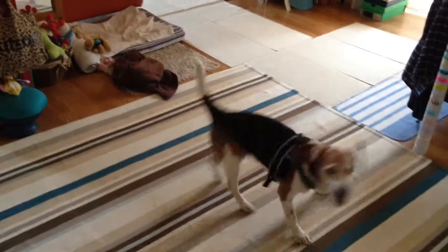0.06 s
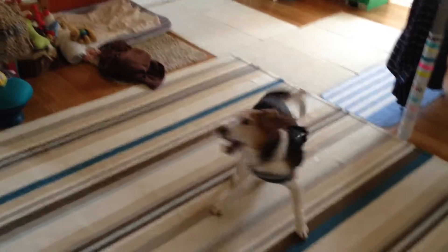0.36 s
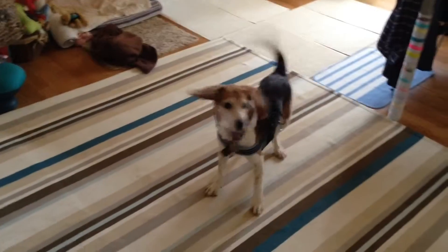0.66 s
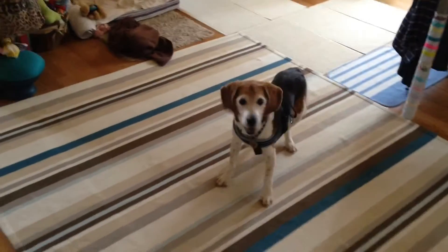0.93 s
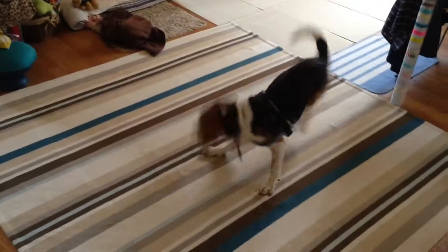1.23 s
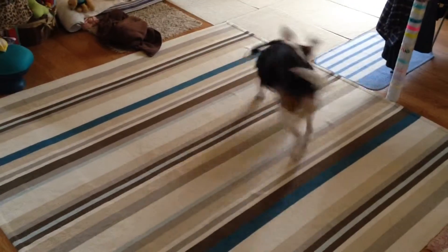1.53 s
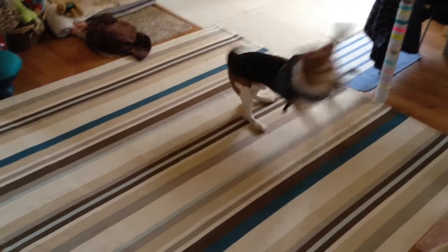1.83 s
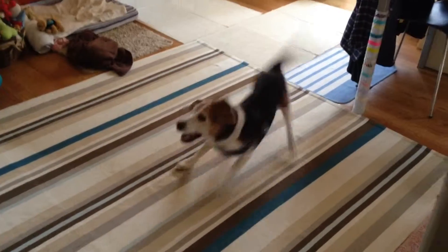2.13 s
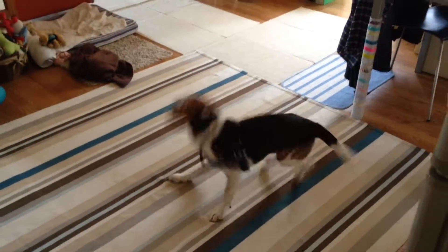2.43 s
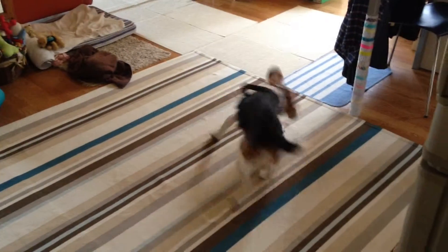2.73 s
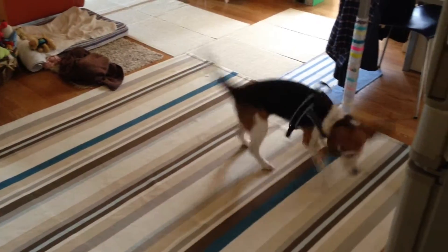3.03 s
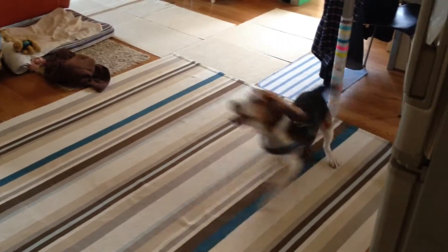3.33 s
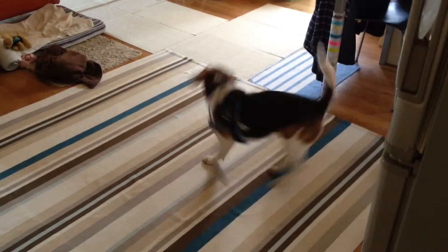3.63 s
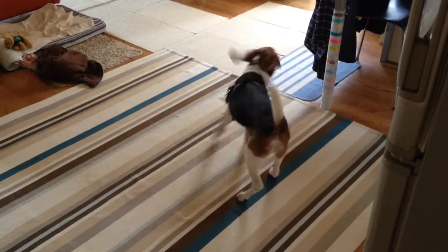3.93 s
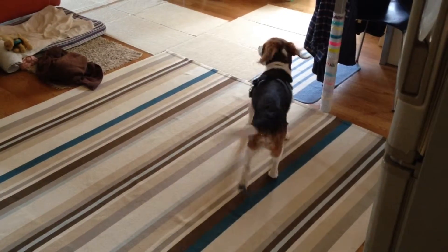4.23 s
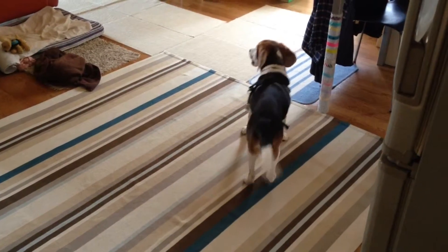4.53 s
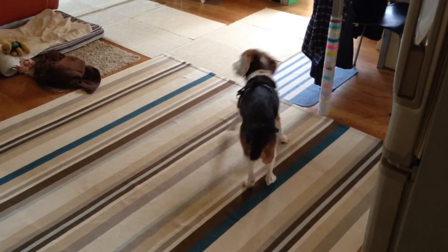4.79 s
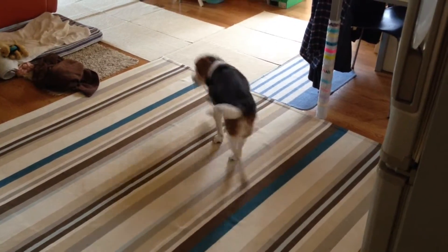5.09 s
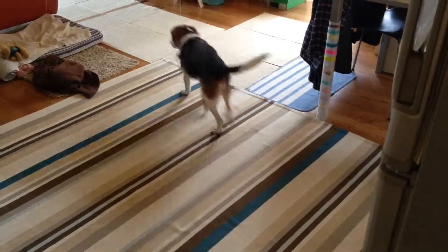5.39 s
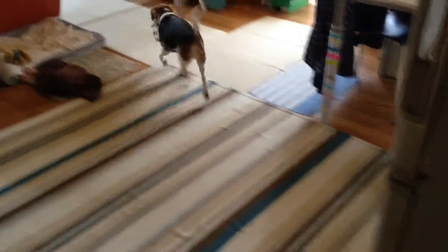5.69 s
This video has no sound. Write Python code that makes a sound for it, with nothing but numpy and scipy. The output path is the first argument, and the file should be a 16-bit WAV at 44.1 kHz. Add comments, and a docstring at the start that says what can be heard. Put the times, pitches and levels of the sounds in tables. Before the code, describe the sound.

A dog plays on a rug over wooden boards, heard from nearby in a quiet living room with a faint hush and a short echo. From the start its paws land in quick, irregular pats with tiny claw ticks, each followed by a low thud from the boards. The steps ease off just before 1 second, then return louder at about 1.2 seconds. Until nearly 4 seconds the paws thump and scrabble, scuffing the weave at around 1.5, 2.2 and 2.8 seconds, while fur and straps rustle softly. Metal harness fittings give small, bright clinks, loudest near 2.1 and 3.6 seconds. The steps fade and pause at about 4.2 seconds, with one faint clink just after. Near 5 seconds the dog trots off on softer steps, with light scuffs and a last small clink close to 6 seconds.

```python
"""A dog romps on a rug over wooden boards in a quiet living room. From the first step, each paw slaps
the rug and its weight makes the boards thud a moment later. After about a second the play gets louder:
turning paws scuff the weave, fur rustles, and metal harness fittings clink, loudest near 2.1 and 3.6 s.
The steps fade and pause at about 4.2 s. Near 5 s the dog trots off on softer steps."""
import sys
import numpy as np
from scipy import signal
from scipy.fft import rfft, irfft, next_fast_len
from scipy.io import wavfile

SR = 44100
rng = np.random.default_rng(int(sys.argv[2]) if len(sys.argv) > 2 else 0)


def output_pcm(signal):
    """Save a mono or channel-first signal as 16-bit PCM at the path in sys.argv[1].

    Samples are clipped to [-1, 1] before scaling.
    """
    pcm = np.clip(np.atleast_2d(signal).T, -1, 1) * 32767
    wavfile.write(sys.argv[1], SR, np.round(pcm).astype(np.int16))


N = 262395
T = np.arange(N) / SR


def from_db(db):
    """Turn decibels (dB) into a number to multiply by."""
    return 10 ** (np.asarray(db) / 20)


def at_hz(points, hz):
    """Read between the rows of a table, giving every octave equal room."""
    freqs, values = np.transpose(points)
    return np.interp(np.log(np.maximum(hz, 1)), np.log(freqs), values)


def coloured(noise, colour):
    """Shape a noise with rows of (Hz, dB), then set its average power to 1."""
    gains = from_db(at_hz(colour, np.fft.rfftfreq(len(noise), 1 / SR)))
    shaped = irfft(rfft(noise) * gains, len(noise))
    return shaped / np.sqrt(np.mean(shaped ** 2) + 1e-20)


def grains(per_s, spread_db, size=N):
    """Fibres catch and let go, making random clicks of uneven size."""
    sizes = from_db(spread_db * np.minimum(rng.exponential(1, size), 4)) * rng.choice([-1, 1], size)
    return sizes * (rng.random(size) < per_s / SR)


def stroke(s, rise, fade):
    """A loudness curve that peaks at time s. A fade time is how long a sound takes to drop 60 dB."""
    out = np.zeros(N)
    near = (T > s - 10 * rise) & (T < s + 2 * fade)
    t = T[near] - s
    out[near] = np.exp(np.where(t < 0, t / rise, -np.log(1000) * t / fade))
    return out


def ring(blows, hz, fade):
    """Each blow starts one pure tone that dies away."""
    r, w = np.exp(-np.log(1000) / (fade * SR)), 2 * np.pi * hz / SR
    return signal.lfilter([0, np.sin(w)], [1, -2 * r * np.cos(w), r * r], blows + 1e-18)


def resonance(x, hz, width_hz):
    """Keep the part of a sound that lies near one pitch."""
    r, w = np.exp(-np.pi * width_hz / SR), 2 * np.pi * hz / SR
    return signal.lfilter(np.array([1, 0, -1]) * (1 - r * r) / 2, [1, -2 * r * np.cos(w), r * r], x)


# The colour of the quiet room. Each row: frequency in Hz, level in dB.
HUSH_COLOUR = [(18, -74), (30, -26), (349, -7.5), (388, -7), (478, -7), (544, -2), (707, -6), (827, -11),
               (942, -12.5), (1320, -15.5), (1910, -17), (2410, -15.5), (2680, -15), (13200, -19),
               (15400, -20)]

def hush(level_db=-63):
    """A faint, steady noise fills the room."""
    return from_db(level_db) * coloured(rng.standard_normal(N), HUSH_COLOUR)


# How long the room echoes. Each row: frequency in Hz, fade time in seconds.
ECHO_FADES = [(100, 0.58), (300, 0.34), (800, 0.24), (2000, 0.18), (5000, 0.21), (14000, 0.22)]

def room_echoes(sound, first_echo_s=0.0024):
    """Sound bounces around a furnished room in a blur of echoes; the low ones last longest."""
    t = T[:SR // 2]
    edges = np.geomspace(60, 16000, 9)
    echo = np.zeros(len(t))
    for low, high in zip(edges, edges[1:]):
        band_filter = signal.butter(2, [low, high], "band", fs=SR, output="sos")
        band = signal.sosfilt(band_filter, rng.standard_normal(len(t)))
        echo += band * np.exp(-np.log(1000) * t / at_hz(ECHO_FADES, np.sqrt(low * high)))
    echo *= np.clip(t / first_echo_s - 1, 0, 1)
    return signal.fftconvolve(sound, echo / np.sqrt(np.sum(echo ** 2)))[:N]


# The notes of the furniture. Each row: pitch in Hz, width in Hz, level in dB.
FURNITURE_NOTES = [(900, 14, -1), (1450, 46, -28), (1760, 61, -3), (2000, 51, 13.5), (3420, 24, -27)]

def furniture(steps):
    """The furniture rings along with the steps."""
    return sum(from_db(db) * resonance(steps, hz, width_hz) for hz, width_hz, db in FURNITURE_NOTES)


# How much the coat and straps move. Each row: time in seconds, level in dB.
COAT_MOTION = [(0.0, -59.5), (0.13, -49), (0.38, -60.5), (0.63, -65), (1.08, -65.5), (1.23, -55),
               (1.37, -55.5), (1.47, -51.5), (1.94, -58.5), (2.14, -41.5), (2.5, -57), (3.53, -55),
               (4.36, -66), (4.71, -65.5), (5.78, -66.5), (5.95, -60)]
# The colour of their rustle. Each row: frequency in Hz, level in dB.
COAT_COLOUR = [(30, -23), (150, 12), (300, -0.5), (700, 7), (1500, 6.5), (2600, 1.5), (4000, -3.5),
               (7000, -15), (15000, -20)]

def coat(level_db=-3.5):
    """Fur and straps rub softly while the dog moves, and fall silent when it is stillest."""
    times, db = np.transpose(COAT_MOTION)
    power = from_db(2 * np.interp(T, times, db))
    still_power = from_db(2 * np.percentile(db, 10))
    moving = np.sqrt(np.maximum(power - still_power, 0))
    return from_db(level_db) * moving * coloured(grains(per_s=3000, spread_db=2.5), COAT_COLOUR)


# Swishes as the dog turns. Each row: time of the peak in seconds, level in dB.
TURNS = [(.17, -59), (.53, -60.5), (1.215, -59.5), (1.262, -55), (2.385, -63), (2.52, -60.5),
         (2.835, -55.5), (3.585, -63), (5.58, -61)]
# The colour of a swish. Each row: frequency in Hz, level in dB.
SWISH_COLOUR = [(800, -2.5), (2000, 7), (4000, 10.5), (7000, 6), (10000, 4), (15500, -10)]

def swishes():
    """Straps brush over fur with a smooth, airy sound."""
    sweep = sum(from_db(db) * stroke(s, rise=0.046, fade=0.29) for s, db in TURNS)
    return sweep * coloured(rng.standard_normal(N), SWISH_COLOUR)


# Metal fittings knocking. Each row: start in seconds, level in dB, pitch in Hz, fade time in seconds.
KNOCKS = [(0.113, -46, 5400, 0.15), (0.161, -52, 4700, 0.17), (0.5497, -43, 12100, 0.02),
          (1.09, -57.5, 6860, 0.031), (2.052, -49, 8300, 0.03), (2.065, -47, 5730, .049),
          (2.114, -33.5, 4800, 0.051), (2.221, -41.5, 4540, 0.068), (2.2957, -39.5, 5650, 0.052),
          (2.35, -46, 5240, .04), (2.87, -56, 5940, 0.2), (3.207, -52.5, 5400, 0.27),
          (3.595, -44.5, 4760, 0.05), (3.6274, -31.5, 4340, 0.032), (4.357, -49.5, 5340, 0.048),
          (5.808, -52, 5340, 0.11)]
# The notes of the harness ring. Each row: pitch in Hz, level in dB, fade time in seconds.
RING_NOTES = [(4022, -19, .12), (4755, -17, .1), (6253, -11, .12), (7077, -14, .36), (7376, -12, .48),
              (7400, -17, .45)]

def harness(ring_db=-7.5, hard_knock_db=-28.5, best_hz=4870, loss_db_per_octave=25):
    """Each fitting knocks with a short crack, and a loose metal ring sings on."""
    # The colour of a crack. Each row: multiple of its pitch, level in dB.
    shape = [(.1, -50), (.25, -32), (.5, -10), (.88, -5), (1, 0),
             (1.12, -3), (1.4, -7), (1.8, -19), (4, -31)]
    cracks, blows = np.zeros(N), np.zeros(N)
    for s, db, hz, fade in KNOCKS:
        colour = [(hz * multiple, level_db) for multiple, level_db in shape]
        crack = coloured(rng.standard_normal(next_fast_len(N)), colour)[:N]
        cracks += from_db(db) * stroke(s, .0001, fade) * crack
        shake_db = 0.45 * (db - hard_knock_db)   # harder knocks shake the ring looser
        loss_db = loss_db_per_octave * abs(np.log2(hz / best_hz))   # small, high fittings pass on less
        blows[int(s * SR)] = from_db(db + shake_db - loss_db + ring_db)
    return cracks + sum(from_db(db) * ring(blows, hz, fade) for hz, db, fade in RING_NOTES)


# The colours of paw pad, rug weave and claw. Each row: frequency in Hz, level in dB.
PAD_COLOUR = [(30, -53), (120, -4), (300, 5), (500, -0.5), (900, 0), (1300, -4.5), (1800, -46), (4000, -44)]
WEAVE_COLOUR = [(300, -46), (700, -44), (1200, -1.5), (1520, 2), (1850, -2), (2300, 1.5), (3000, -2),
                (3800, -16), (5000, -22.5), (9000, -52)]
CLAW_COLOUR = [(2000, -38), (3400, 11.5), (4300, 9.5), (5400, 2.5), (6500, -0.5), (8000, -8), (11000, -19),
               (15500, -34)]

def paw_on_rug(s, pressure, db, hardness_db, spot_hz, boost_db, per_s, spread_db, size=16384):
    """A paw crushes fibres, and that spot of floor boosts one pitch. Harder means more claw, less pad."""
    start = max(int(s * SR) - size // 4, 0)
    parts = [(db - 1.5 - hardness_db, PAD_COLOUR), (db, WEAVE_COLOUR),
             (db - 6.5 + hardness_db, CLAW_COLOUR)]
    crush = sum(from_db(part_db) * coloured(grains(per_s, spread_db, size), colour)
                for part_db, colour in parts)
    pressed = crush[:N - start] * pressure[start:start + size]
    woody = pressed + (from_db(boost_db) - 1) * resonance(pressed, spot_hz, width_hz=80 + spot_hz / 10)
    out = np.zeros(N)
    out[start:start + size] = woody * np.std(pressed) / np.std(woody)
    return out


# Paws sliding. Each row: time of the peak in seconds, level in dB, hardness in dB,
# rise and fade times in seconds, pitch of the floor spot in Hz, its boost in dB.
SLIDES = [(0.192, -54, 3.5, 0.013, 0.04, 4540, 5), (0.494, -57.5, 3.5, 0.01, 0.28, 2210, 4.5),
          (1.489, -56, -1, .03, 0.061, 1520, 18), (1.518, -41, 8.5, 0.0064, 0.031, 2280, 22),
          (1.689, -58.5, -1.5, 0.013, 0.25, 1230, 4), (2.095, -50.5, -3, 0.043, 0.52, 2170, 20),
          (2.212, -42.5, -3, 0.012, 0.088, 1050, 17), (2.231, -39, -2, .016, 0.11, 1570, 8.5),
          (2.549, -45.5, 1.5, 0.027, 0.12, 2360, 4.5), (2.826, -41, -0.5, 0.017, 0.097, 1900, 0),
          (4.154, -62, -5, 0.0093, 0.039, 1600, 11), (5.01, -61.5, 0, 0.0069, 0.16, 670, 15),
          (5.243, -60.5, -1, 0.005, .09, 587, 5), (5.573, -56.5, 2, 0.018, 0.18, 1610, 5),
          (5.665, -52, 4, 0.0034, 0.08, 2360, 15), (5.782, -54.5, 4, .0063, 0.22, 3170, -5)]

def scuffs(judder_db=1.5):
    """A sliding paw swells up and judders as it catches on the weave."""
    slides = np.zeros(N)
    for s, db, hardness_db, rise, fade, spot_hz, boost_db in SLIDES:
        pressure = stroke(s, rise, fade)
        slides += paw_on_rug(s, pressure, db, hardness_db, spot_hz, boost_db, per_s=2200, spread_db=3)
    catches = coloured(rng.standard_normal(N), [(30, -20), (90, 0), (250, 0), (700, -30), (3000, -60)])
    return slides * from_db(judder_db * catches)


# Paws landing. Each row: start in seconds, slap level in dB, hardness in dB, pitch of the floor spot
# in Hz, thud level in dB, thud pitch in Hz, seconds to full weight, toe knock in dB against the thud.
FOOTFALLS = [(0.026, -50.5, 3, 2200, -37, 242.6, .011, -4.5),
             (0.057, -47.5, -1.5, 560, -41.5, 254.3, .015, -7),
             (0.286, -52.5, 1, 1800, -40, 216.5, 0.01, -15), (0.414, -51, -0.5, 1670, -61, 228, 0.023, -10),
             (0.568, -64.5, -0.5, 870, -69, 218, 0.015, -10), (0.657, -68, -2, 590, -50, 188, 0.025, -8),
             (1.185, -50.5, 1, 2440, -33.5, 206, .013, -22),
             (1.209, -67, -6.5, 1300, -36, 168.4, 0.019, -24),
             (1.326, -58, -4.5, 2560, -39.5, 199, .011, -18), (1.39, -42.5, 0, 1650, -30, 202.3, .011, -21),
             (1.595, -49.5, -4, 790, -32.5, 193.3, 0.018, -14),
             (1.623, -55.5, -3.5, 1580, -34, 220.3, .018, -16),
             (1.748, -59.5, 5.5, 2800, -44, 203, 0.0075, -22),
             (1.82, -48.5, -1, 1630, -28.5, 178, .013, -15), (1.951, -43, -0.5, 2750, -34, 220.6, .021, 2),
             (2.036, -50.5, 0.5, 1540, -31, 236, .011, -15), (2.094, -68, -9, 2200, -36.5, 198, 0.013, -22),
             (2.182, -44.5, 0.5, 2600, -35, 176, .015, -18),
             (2.239, -55.5, -11, 1520, -31.5, 219, 0.016, -10.5),
             (2.46, -55.5, -2, 1650, -62, 223, .012, -14), (2.539, -55, 2, 2480, -38, 214.6, .011, -18),
             (2.632, -48.5, 1, 3500, -40.5, 201, 0.017, -23), (2.65, -75, -7, 1700, -38, 155, 0.021, -16),
             (2.738, -55.5, 3, 2320, -59, 223, .012, -12), (2.781, -53.5, -2, 670, -30.5, 207.6, .01, -10),
             (2.933, -50.5, 0, 2420, -36, 212, .014, -20),
             (2.964, -48, -4.5, 1740, -31.5, 209.7, 0.0081, -9),
             (3.035, -51.5, -2, 2780, -34.5, 222.6, 0.019, -12.5),
             (3.121, -50.5, -1, 2170, -44.5, 314.4, 0.023, -6),
             (3.29, -61, -3, 1500, -51, 187.7, .015, -11), (3.349, -51, 3.5, 1810, -39, 186.5, .023, -3),
             (3.461, -45, -3, 563, -28.5, 217.6, .027, -13.5),
             (3.533, -59.5, -2, 1490, -39, 216.3, .016, -28), (3.715, -62, 4.5, 1560, -45, 230, 0.018, -10),
             (3.777, -49.5, -1, 2360, -36, 226.6, 0.025, -14.5),
             (3.892, -63, -4, 2300, -36.5, 176.8, .013, -7), (4.004, -61, 1, 2140, -69, 218, .012, -10),
             (4.09, -66.5, -1.5, 1560, -42.5, 184.3, 0.013, -20),
             (4.21, -74, -6.5, 1600, -44, 206.6, .01, -17), (4.937, -73.5, -4, 1490, -60, 253.6, 0.018, -9),
             (5.149, -64.5, 3, 2470, -52, 188.5, .012, -8),
             (5.363, -55.5, 0, 1630, -43.5, 202.3, 0.015, -16), (5.45, -74, 6, 1600, -43.5, 176, 0.02, -24),
             (5.568, -62, 1, 1610, -46, 173, .021, -18), (5.657, -68.5, 3, 2300, -51.5, 210.5, .011, -18),
             (5.773, -58.5, 2.5, 3200, -38, 182, .015, -19)]

def slaps(level_db=7.0, usual_db=-48, give_s=0.0014):
    """A landing pad gives for a moment and crushes many fibres at once."""
    out = np.zeros(N)
    for s, db, hardness_db, spot_hz, *_ in FOOTFALLS:
        gentle_db = usual_db - db
        rise = 0.0021 * from_db(0.62 * gentle_db - 1.37 * hardness_db)   # strong, hard steps bite sooner
        fade = 0.061 * from_db(0.19 * gentle_db)   # gentle steps die away more slowly
        pressure = stroke(s + give_s, rise, fade)
        out += paw_on_rug(s, pressure, db, hardness_db, spot_hz, boost_db=9, per_s=7000, spread_db=2)
    return from_db(level_db) * out


def claws(level_db=5.5):
    """A claw tip ticks on the hard backing of the rug as the paw comes down."""
    ticks = sum(from_db(db + hardness_db) * stroke(s + 0.00065, rise=0.00017, fade=0.0074)
                for s, db, hardness_db, *_ in FOOTFALLS)
    colour = [(500, -34), (1300, -9), (2300, 7), (4500, 11), (6500, -7), (10000, -6), (15500, -24)]
    return from_db(level_db) * ticks * coloured(rng.standard_normal(N), colour)


def board_bends():
    """A step bends the boards three times. Each row: time in seconds, dB, Hz, length in seconds."""
    bends = []
    for s, _, _, _, db, hz, press_s, toe_db in FOOTFALLS:
        length = 0.00452 + .5 * press_s
        settle_s = s + press_s + rng.normal(.033, 0.00523)
        settle_hz = hz * 1.05 * np.exp(rng.normal(0, .12))
        bends += [(s + .65 * press_s, db + toe_db, hz * 1.6, .75 * length),   # the toes land
                  (s + press_s, db, hz, length),   # the full weight arrives
                  (settle_s, db - 13.5, settle_hz, 1.3 * length)]   # the leg settles
    return bends


# The boards' own notes. Each row: pitch in Hz, level in dB, fade time in seconds.
BOARD_NOTES = [(78, -16.5, 0.33), (122.3, -15, 0.29), (149.6, 8.5, 0.31), (181, -10, 0.17),
               (225.7, 10, 0.23), (295.5, 1, 0.33), (369.4, -11.5, 0.3)]

def thuds(sag=0.058, ringing_db=-20.5, rumble_db=-25):
    """The boards swing a few times and rumble under each paw, then ring on faintly."""
    out, load, bends = np.zeros(N), np.zeros(N), board_bends()
    for (s, db, hz, length), phase in zip(bends, rng.random(len(bends))):
        near = np.abs(T - s) < 4 * length
        t = T[near] - s
        width = length * np.where(t < 0, 0.57, 0.82)   # swells faster than it fades
        weight = from_db(db) * np.exp(-(t / width) ** 2)
        pitch = hz * (1 - sag * np.tanh(t / length))   # the pad flattens and the note sags
        out[near] += weight * np.sin(2 * np.pi * (np.cumsum(pitch) / SR + phase))
        load[near] += weight
    starts = [int((s - length / 2) * SR) for s, _, _, length in bends]
    strengths = np.array([from_db(db) * rng.normal(0, 1, len(BOARD_NOTES)) for _, db, _, _ in bends])
    for (hz, db, fade), strength in zip(BOARD_NOTES, strengths.T):
        blows = np.zeros(N)
        blows[starts] = strength
        out += from_db(db + ringing_db) * ring(blows, hz, fade)
    rumble_colour = [(20, -28), (55, -19), (85, 5), (300, -1), (600, 4), (1000, 1.5), (2500, -23)]
    rumble = coloured(rng.standard_normal(N), rumble_colour)
    return out + from_db(rumble_db) * load * rumble


def scene():
    """Add the dog's sounds, their echoes and the hush of the room into one channel."""
    boards = thuds()
    steps = slaps() + scuffs() + claws()
    metal = harness()
    echoes = room_echoes(from_db(-19) * boards + from_db(-7) * steps
                         + from_db(-21) * furniture(steps) + from_db(-9.5) * metal)
    return (hush() + echoes + swishes() + coat() + metal + steps + boards)[None]


def record(dry):
    """The microphone loses the deep bass, and the highest treble is cut steeply."""
    bass_cut = signal.butter(2, 75, "high", fs=SR, output="sos")
    treble_cut = signal.ellip(10, .2, 70, 15500, fs=SR, output="sos")
    return signal.sosfilt(treble_cut, signal.sosfilt(bass_cut, dry))


dry = scene()
out = record(dry)
output_pcm(out)
```